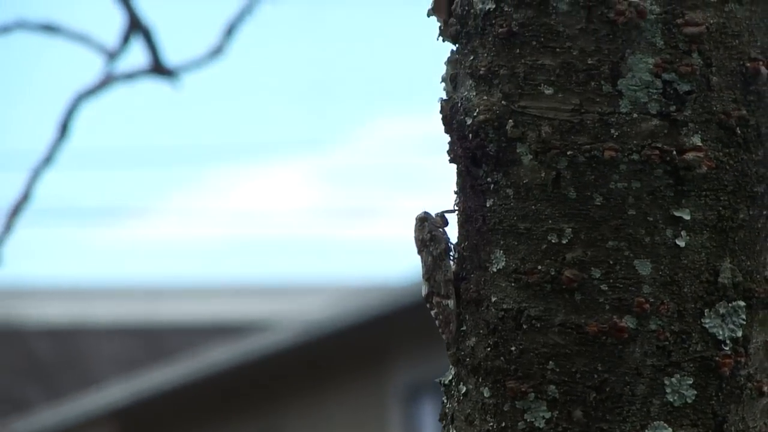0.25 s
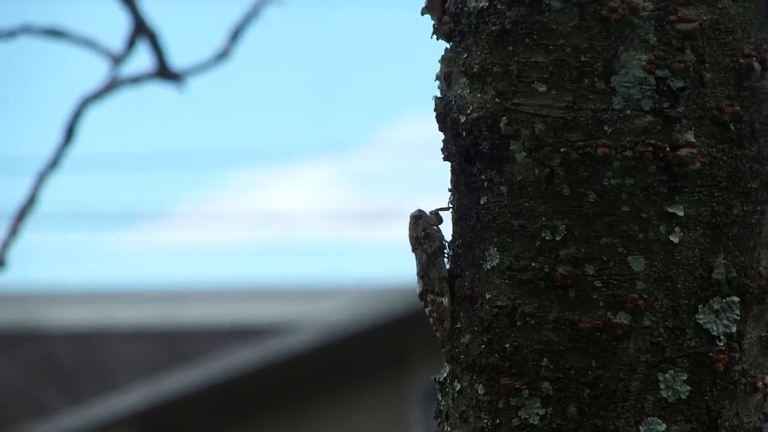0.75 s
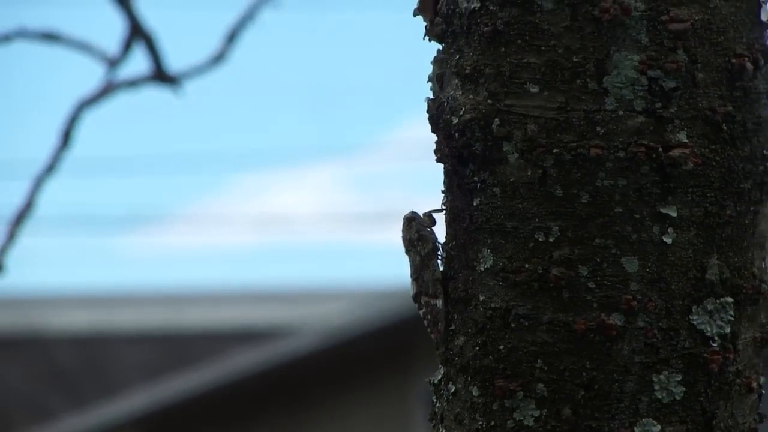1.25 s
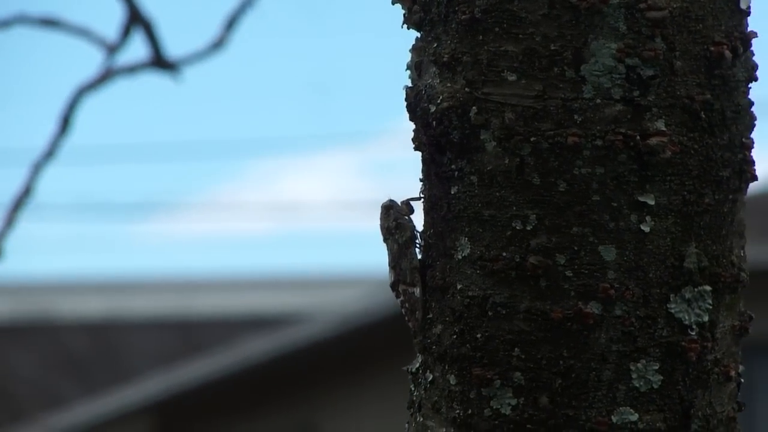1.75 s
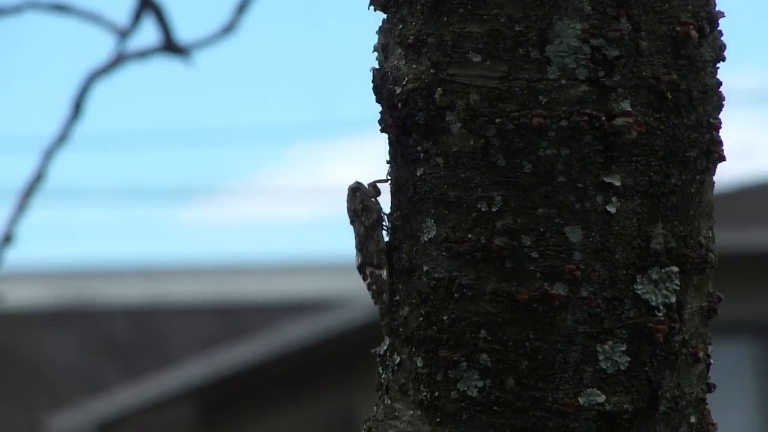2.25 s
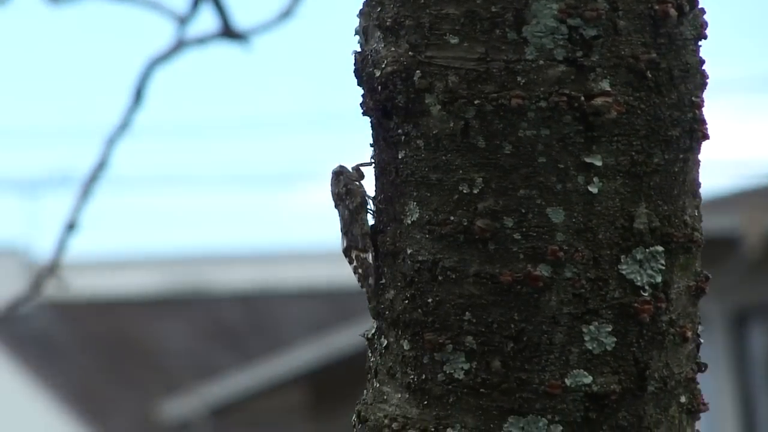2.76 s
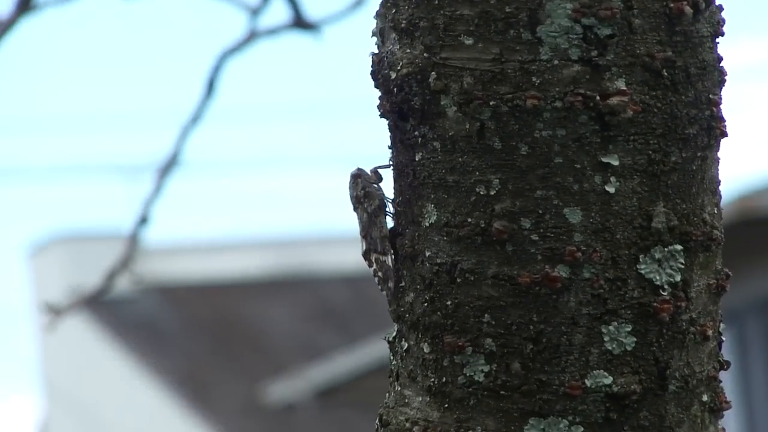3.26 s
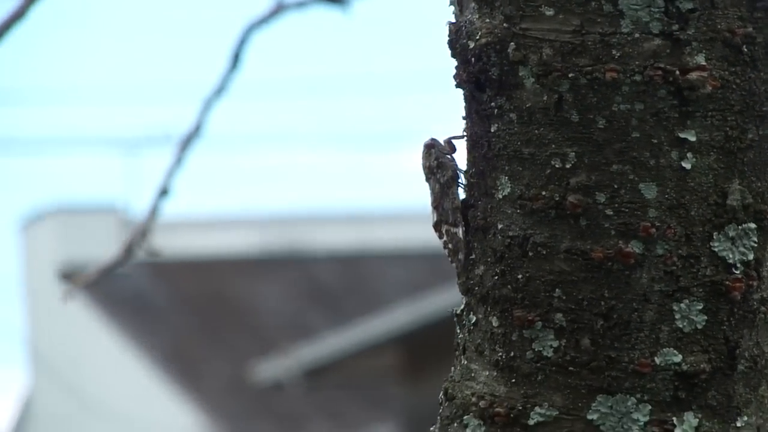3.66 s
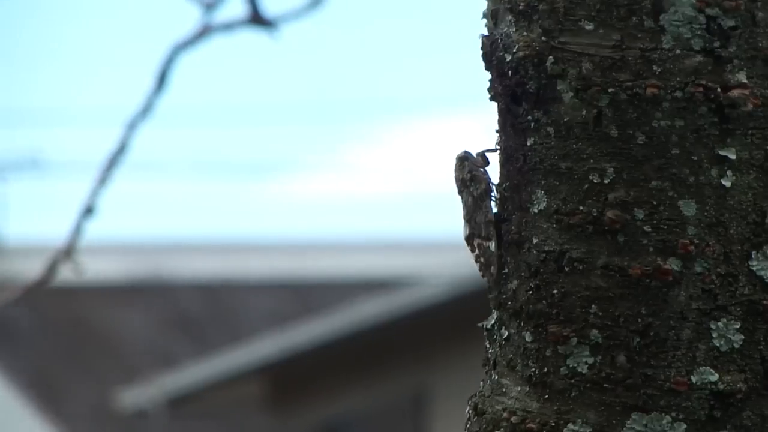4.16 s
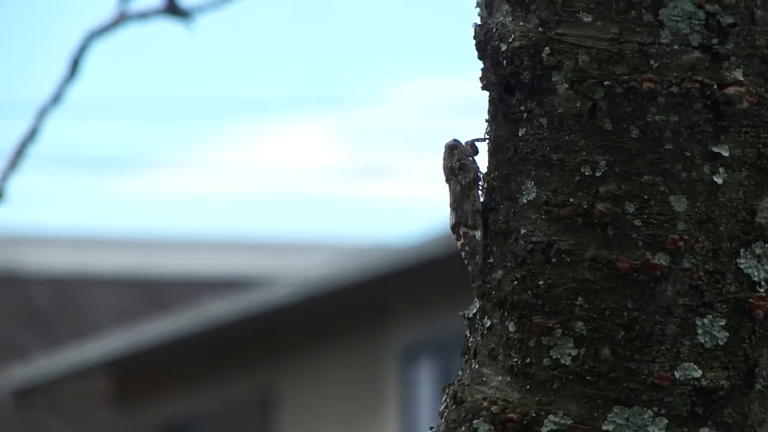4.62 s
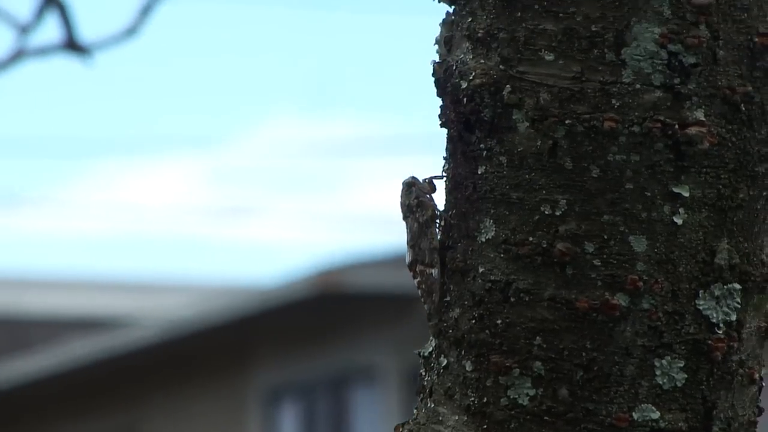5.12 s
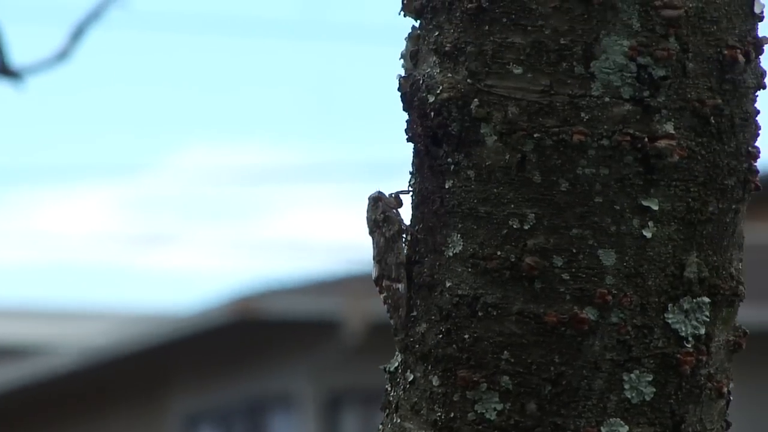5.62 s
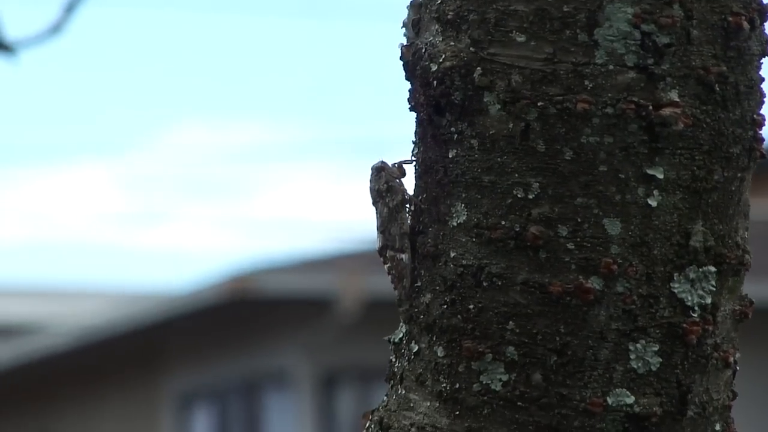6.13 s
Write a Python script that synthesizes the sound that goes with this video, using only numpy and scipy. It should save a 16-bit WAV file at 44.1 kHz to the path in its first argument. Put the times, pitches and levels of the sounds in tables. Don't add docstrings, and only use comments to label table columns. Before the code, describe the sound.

A single cicada, very close, sings throughout on a trunk outdoors. Its song is a shrill mechanical rattle: short bursts of some ten crisp clicks, each burst roughly 20 milliseconds long, repeating about sixteen times a second at first and easing to about fourteen by the end, with slightly uneven gaps. The tone is bright and dry, strongest around 6 to 11 kHz, with short faint echoes. The level opens up over the first 0.5 seconds. Low wind thumps batter left and right separately from 0 to 0.5, continue in bumps, peak heavily around 1.3 to 1.45, and fade by 2. Another flurry strikes at 2.6 to 2.8. From 3 to 6.1 the wind is nearly absent, leaving the chirps clear over a soft, dull wash of distant town, a barely audible motor hum and thin far-cicada hiss. A low gust rises at the end, about 6.3, as the chirping continues.

```python
import sys
import numpy as np
from scipy import signal
from scipy.fft import rfft, irfft, next_fast_len
from scipy.io import wavfile
from scipy.ndimage import uniform_filter1d

SR = 44100
rng = np.random.default_rng(int(sys.argv[2]) if len(sys.argv) > 2 else 0)


def boost_factor(decibels):
    exponent = np.asarray(decibels, float) / 20
    return 10 ** exponent


def store_pcm(level_fs):
    pcm = np.round(np.clip(level_fs, -1, 1) * 32767).astype(np.int16)
    wavfile.write(sys.argv[1], SR, np.atleast_2d(pcm).T)


N = 281619
TIME = np.arange(N) / SR


def evened(x):
    return x / np.sqrt(np.mean(x ** 2) + 1e-20)


def read(points, hz):
    f, value = np.transpose(points)
    return np.interp(np.log(hz + 1), np.log(f + 1), value)


def add(mix, s, sound):
    at = round(s * SR)
    part = mix[max(at, 0):][:len(sound) + min(at, 0)]
    part += sound[max(-at, 0):][:len(part)]


def shaped(x, gain):
    size = next_fast_len(N + 4096)
    hz = np.fft.rfftfreq(size, 1 / SR)
    return irfft(rfft(x, size) * gain(hz), size)[..., :N]


def hum():
    level_db, pitch_hz, waver_hz = -52, 700, 3.064
    waver = evened(shaped(rng.standard_normal(N), lambda hz: hz < 3.))
    return boost_factor(level_db) * np.sin(2 * np.pi * np.cumsum(pitch_hz + waver_hz * waver) / SR)


# pitch_hz, likeness (0 to 1)
PORT_LIKENESS = [(150, 0.79), (400, 0.98), (2500, 0.67), (11400, 0.14)]
# pitch_hz, left_minus_right_db
PORT_LEAN = [(60, 0), (300, -5.5), (2500, 0.5), (11400, -1)]
# pitch_hz, left_lead_radians
PORT_LEAD = [(300, 0.04), (2150, 0.54), (3100, 0.62), (11500, 0.11)]


def wash(spectrum, level_db, patchy_db):
    hz = np.fft.rfftfreq(1024, 1 / SR)
    a, b, c, d, patches = rng.standard_normal((N // 256 + 5, 513, 5)).T
    patches = uniform_filter1d(patches, size=10, axis=0)
    patches = evened(uniform_filter1d(patches, size=16, axis=1))
    same = np.clip(read(PORT_LIKENESS, hz), -1, 1)[:, None]
    lag = np.exp(-1j * read(PORT_LEAD, hz))[:, None]
    left = a + 1j * b
    right = same * left * lag + np.sqrt(1 - same ** 2) * (c + 1j * d)
    lean = boost_factor(read(PORT_LEAN, hz) / 2)[:, None]
    colour = boost_factor(read(spectrum, hz)[:, None] + patchy_db * patches)
    z = np.array([left * lean, right / lean]) * colour
    noise = signal.istft(z, nperseg=1024, noverlap=768)[1][:, :N]
    return boost_factor(level_db) * evened(noise)


# pitch_hz, level_db (per Hz)
TOWN_SPECTRUM = [(20, -39), (130, -23.5), (220, -11.5), (460, -2), (800, -3), (1500, -4.5), (2000, -8.5),
                 (2500, -17.5), (3100, -26), (5200, -27), (7000, -51)]


def town():
    return wash(TOWN_SPECTRUM, -34, patchy_db=0.89)


# pitch_hz, level_db (per Hz)
CHORUS_SPECTRUM = [(4300, -58), (5100, -18), (5800, -2.5), (6700, -4.5), (7900, -5), (8500, -8.5),
                   (10500, -14.5), (13000, -21)]


def chorus():
    return wash(CHORUS_SPECTRUM, -46, patchy_db=2.1)


# pitch_hz, t60_s
ECHO_DECAY = [(5000, 0.11), (11000, 0.14)]


def yard(x):
    taps = np.zeros((2, SR // 2))
    at = np.arange(60, SR // 2 - 20, 20)
    at = at + rng.integers(0, 20, (2, len(at)))
    np.put_along_axis(taps, at, rng.choice([-1., 1.], at.shape), 1)
    hz, t, z = signal.stft(taps, SR, nperseg=256)
    decay = boost_factor(-60 * t / read(ECHO_DECAY, hz)[:, None])
    tail = signal.istft(z * decay, SR, nperseg=256)[1]
    return signal.fftconvolve(x[None], tail / np.linalg.norm(tail[0]), axes=1)[:, :N]


# pitch_hz, level_db (per Hz)
TURBULENCE = [(20, -20.5), (120, -2), (200, -2.5), (500, -14), (900, -35), (3000, -88)]


def turbulence():
    noise, lumps = rng.standard_normal((2, N))
    lumps = evened(shaped(lumps, lambda hz: 1 / (1 + (hz / 31.0) ** 4)))
    noise = shaped(noise, lambda hz: boost_factor(read(TURBULENCE, hz)))
    return evened(noise * boost_factor(8.0 * np.clip(lumps, -2, 1.5)))


def thump(level_db, pitch_hz, phase):
    t = np.arange(-600, 600) / SR
    cycles = 1.02
    bell = .5 ** (abs(2 * pitch_hz * t / cycles) ** 2.54)
    turn = 2 * np.pi * (pitch_hz * t * (1 - 10 * t) + phase)
    return boost_factor(level_db) * bell * (np.cos(turn) + 0.16 * np.sin(2 * turn))


# start_s, left_level_db, right_level_db
GUST_LEVELS = [(0.0, -32, -34), (0.125, -38.5, -29), (0.45, -29.5, -29), (0.65, -44, -43.5),
               (1.0, -38.5, -34), (1.21, -45, -40), (1.375, -25, -26), (1.5, -39.5, -36.5),
               (1.9, -34.5, -34), (2.125, -48.5, -44.5), (2.4, -39, -41.5), (2.6, -48.5, -43),
               (2.75, -33, -37.5), (2.9, -50, -44.5), (3.75, -59.5, -60), (4.5, -55, -49), (6.1, -58, -51),
               (6.375, -33, -41)]
# peak_s, level_db, pitch_hz
LEFT_THUMPS = [(0.006, -25, 295), (0.026, -17, 310), (0.367, -21, 204), (0.397, -30, 280),
               (0.414, -16, 220), (0.424, -17, 300), (0.662, -20, 189), (0.938, -13.5, 266.4),
               (1.129, -18.5, 222), (1.146, -22, 230.3), (1.339, -9, 385.5), (1.351, -8.5, 235),
               (1.357, -3.5, 317), (1.37, -14, 352), (1.383, -18, 330), (1.416, -17, 209),
               (1.428, -10, 344), (1.439, -22, 250), (1.548, -17.5, 248), (1.585, -16, 210.4),
               (1.783, -11.5, 229), (2.652, -11.5, 270), (2.666, -19, 199.3), (2.676, -18, 240),
               (2.698, -12, 207), (2.759, -18.5, 230)]
# peak_s, level_db, pitch_hz
RIGHT_THUMPS = [(0.004, -16, 383), (0.045, -17, 295), (0.104, -15.5, 310), (0.163, -17, 324),
                (0.182, -14, 330), (0.225, -21, 220), (0.258, -13, 282), (0.337, -11, 350),
                (0.344, -9, 290), (0.395, -10, 370), (0.425, -6.5, 313), (0.463, -12.5, 320),
                (0.509, -6, 279), (1.025, -17, 280), (1.038, -13, 257), (1.302, -9.5, 288),
                (1.322, -12, 338), (1.347, -16, 250), (1.388, -15, 212), (1.409, -12.5, 269),
                (1.427, -17, 279), (1.436, -11, 223), (1.568, -18, 230), (1.659, -17.5, 240),
                (1.805, -28, 260), (1.952, -16, 289.7), (2.633, -15, 230), (2.673, -8.5, 289),
                (2.681, -13, 246), (2.719, -13, 300)]


def wind():
    s, *levels = np.transpose(GUST_LEVELS)
    ports = np.zeros((2, N))
    for port, level_db, thumps in zip(ports, levels, (LEFT_THUMPS, RIGHT_THUMPS)):
        port += turbulence() * boost_factor(np.interp(TIME, s, level_db))
        for (peak_s, db, hz), phase in zip(thumps, rng.random(len(thumps))):
            add(port, peak_s - 600 / SR, thump(db, hz, phase))
    ports = shaped(ports, lambda hz: 1 / np.sqrt(1 + (105 / (hz + 1)) ** 4))
    return ports - 0.28 * ports[::-1]


# start_s, effort_db, row_ms (length of the row of clicks)
CHIRPS = [(0.0, -23, 15), (0.058, -20.5, 19), (0.1183, -20.5, 19), (0.1687, -22.5, 24.5),
          (0.226, -23, 25), (0.2931, -23, 20.7), (0.3532, -23, 32.5), (0.412, -21, 18.3),
          (0.4805, -23.5, 18.7), (0.552, -24, 21.4), (0.6088, -23.5, 21.3), (0.67, -22, 19.3),
          (0.72, -22.5, 24), (0.782, -22, 19), (0.8388, -20.5, 13.4), (0.8981, -23, 19),
          (0.955, -22.5, 18), (1.0017, -23, 24), (1.065, -21, 15.6), (1.1281, -23, 17),
          (1.1827, -23, 24), (1.246, -22.5, 20.4), (1.3093, -23, 22.7), (1.3759, -23.5, 17),
          (1.4393, -23, 17), (1.507, -22.5, 15.4),
          (1.5663, -24.5, 20), (1.6379, -23, 19), (1.706, -23, 15.8), (1.759, -21.5, 18.6),
                 (1.8207, -22.5, 20.3), (1.8856, -23, 22.7), (1.949, -23, 18), (2.0142, -21.5, 18),
                 (2.0798, -24, 20.2), (2.1514, -24, 20.4), (2.2105, -22.5, 20.7), (2.2787, -23.5, 20.5),
                 (2.3468, -23, 18.6), (2.4113, -25, 20.4), (2.4961, -23.5, 16.3), (2.556, -22, 18.5),
                 (2.6124, -22.5, 17), (2.675, -26, 20.7), (2.75, -23.5, 21.5), (2.814, -24, 18.8),
                 (2.8757, -21.5, 17.7), (2.9379, -24, 18.7), (3.005, -21.5, 15),
          (3.0909, -26, 19), (3.155, -24, 18.7), (3.2187, -24.5, 15.8), (3.299, -25, 16),
                (3.356, -23.5, 19), (3.4277, -21.5, 13), (3.4983, -22.5, 13.7), (3.5682, -23.5, 15),
                (3.6278, -25, 20.3), (3.6951, -25.5, 17.8), (3.764, -26, 16), (3.8319, -25.5, 20),
                (3.8868, -25, 23), (3.9964, -23.5, 14), (4.055, -25, 20.5), (4.1234, -23, 15.7),
                (4.1921, -24.5, 18), (4.256, -23, 20), (4.3249, -22.5, 16.5), (4.3904, -22, 15.7),
          (4.5038, -20.5, 32), (4.5729, -24.5, 19.3), (4.642, -21.5, 18.4), (4.711, -21.5, 14.6),
                 (4.7771, -22, 14), (4.856, -20, 11.7), (4.9206, -21, 14.3), (4.9805, -23.5, 21.7),
                 (5.0568, -21.5, 16.8), (5.1352, -23.5, 18), (5.207, -20, 14.3), (5.2998, -22.5, 13.2),
                 (5.377, -20.5, 11.2), (5.435, -23.5, 20.5), (5.5056, -21, 15.2), (5.5772, -22, 15),
                 (5.696, -21, 9.1), (5.7596, -20, 16.7), (5.8307, -23.5, 17), (5.9434, -22, 17),
                 (6.0142, -21.5, 10.6), (6.0795, -23.5, 22), (6.1603, -22.5, 16.2), (6.2323, -22.5, 18),
                 (6.3021, -21.5, 15), (6.381, -25.5, 15.4)]


def ribs():
    times, dbs = [], []
    jitter, loosening = .02, .011
    first_db, fading_db, uneven_db, rebound_db = -2.0, -4.5, 1.7, -9.
    for s, effort_db, row_ms in CHIRPS:
        chance = np.clip(rng.standard_normal((26, 2)), -2, 2)
        (pace, pause), (force, _) = chance[:2]
        timing, strength = chance[2:].T
        k = np.arange(len(timing))
        spacing_ms = 1.95 + .08 * s + .18 * pace
        closing_ms = row_ms + 4.1 + 1 * pause
        closing_db = -26.5 + 2.5 * force
        drift = np.cumsum((jitter + loosening * k) * timing * (k > 0))
        ms = spacing_ms * (k + drift)
        db = effort_db + uneven_db * strength + first_db * (k == 0) + fading_db * (ms / row_ms) ** 2
        row = ms < row_ms + spacing_ms / 2
        times += [*(s + ms[row] / 1000), s + closing_ms / 1000, s + (closing_ms + spacing_ms) / 1000]
        dbs += [*db[row], closing_db, closing_db + rebound_db]
    return np.array(times), np.array(dbs)


# pitch_hz, width_hz, level_db, lag_ms
BODY_MODES = [(2900, 1000, -26, 0.11), (4430, 660, -21.5, .1), (13200, 2300, -4, 0.45),
              (5797, 380, -8.5, 0.457), (6250, 570, -9, 0.333), (6627, 282, 2.5, 0.15),
              (7220, 233, -1, 0.027), (7850, 315, -0.5, 0.338), (8660, 380, -15, 0.653),
              (9080, 424, -7, 0.18), (10100, 478, -2.5, 0.505), (10620, 885, -1.5, 0.274)]


def cicada():
    times, dbs = ribs()
    out, t = np.zeros((2, N)), np.arange(420)[:, None] / SR
    hz, width, mode_db, lag = np.transpose(BODY_MODES)
    level_db, colour_db = 4.5, 2.0
    slip, spread, detune = .5, 0.24, .009
    rise_ms, crest_ms = .45, .7
    lead_s = crest_ms / 2000
    since = np.maximum(t - abs(lag) / 1000, 0)
    shape = (1 - np.exp(-since * 1000 / rise_ms)) ** 2 * np.exp(-np.pi * width * since)
    chances = rng.standard_normal((len(times), 4, len(BODY_MODES)))
    for s, db, (mix, pitch, phase, aim) in zip(times, dbs, chances):
        tuned_hz = hz * (1 + detune * pitch)
        rings = shape * np.exp(2j * np.pi * tuned_hz * (since - crest_ms / 1000))
        strength = boost_factor(db + level_db + mode_db + colour_db * mix) * np.exp(1j * slip * phase)
        beam = np.exp(1j * spread * aim * (hz / 9000) ** 3)
        add(out[0], s - lead_s, (rings @ (strength * beam)).real)
        add(out[1], s - lead_s, (rings @ (strength / beam)).real)
    return out


# start_s, level_db
OPENING_GAIN = [
    (.06, -9),
    (.2, -3),
    (.32, -0.5),
    (.45, 0),
]


def scene():
    left, right = cicada()
    right = shaped(right, lambda hz: boost_factor(-read(PORT_LEAN, hz)) * np.exp(-1j * read(PORT_LEAD, hz)))
    near = np.array([left, right])
    air = hum() + town() + chorus() + boost_factor(-14.5) * yard(left) + near
    return air * boost_factor(np.interp(TIME, *np.transpose(OPENING_GAIN))) + wind()


# pitch_hz, width_hz, level_db
HOUSING_DIPS = [(2990, 223, -7), (4013, 250, -13.5), (5025, 220, -14)]
# pitch_hz, level_db
TREBLE_EDGE = [(10900, 0), (11400, -4), (12000, -14), (16000, -30)]


def microphone(dry):
    def colour(hz):
        dips_db = sum(db / (1 + (2 * (hz - f) / width) ** 2) for f, width, db in HOUSING_DIPS)
        return boost_factor(dips_db + read(TREBLE_EDGE, hz))
    return shaped(dry, colour)


# pitch_hz, level_db
FAINT_LEVEL = [(2000, -90), (3000, -73), (4000, -78), (5200, -77), (10800, -78), (11700, -70)]


def drop_faint(heard):
    hz, t, z = signal.stft(heard, SR, "cosine", nperseg=1536, noverlap=768)
    starts = np.arange(0, len(hz), 6)
    power = np.add.reduceat((abs(z) ** 2).mean(0), starts)
    power_db = 10 * np.log10(power + 1e-20)
    faint_db = read(FAINT_LEVEL, hz[starts])[:, None] + np.interp(t, *np.transpose(OPENING_GAIN))
    faint_db += 2.5 * rng.standard_normal(power_db.shape)
    keep = np.repeat(power_db > faint_db, np.diff(starts, append=len(hz)), axis=0)
    return signal.istft(z * keep, SR, "cosine", nperseg=1536, noverlap=768)[1][:, :N]


def treble_slips(heard):
    slips_per_s = 70
    song = shaped(heard[0], lambda hz: hz > 5500)
    loud = 1. * (uniform_filter1d(song ** 2, size=100) > boost_factor(-62))
    moments = loud * (rng.random(N) < slips_per_s / SR)
    slips = signal.oaconvolve(moments, np.hanning(160), "same")
    top = shaped(heard, lambda hz: hz > 11400)
    return shaped(slips * top, lambda hz: hz > 11400)


def roll_off(x):
    return signal.sosfilt(signal.butter(12, 16000, fs=SR, output="sos"), x)


def record(dry):
    heard = microphone(dry)
    finished = drop_faint(heard) + treble_slips(heard)
    return roll_off(finished)


dry = scene()
out = record(dry)
store_pcm(out)
```